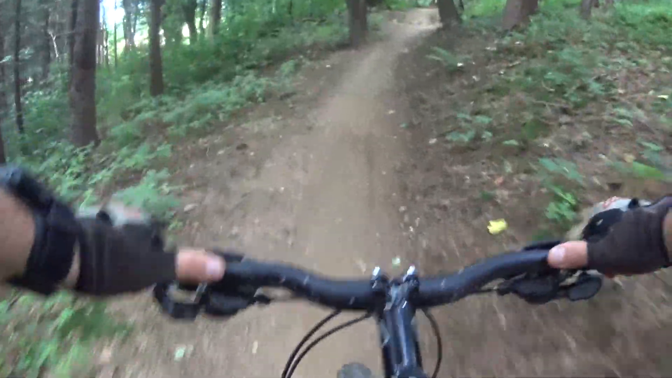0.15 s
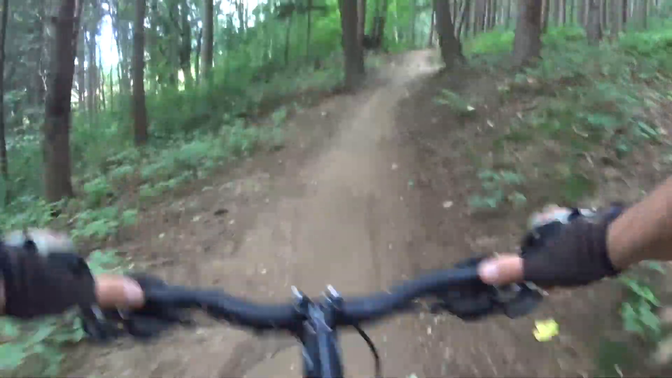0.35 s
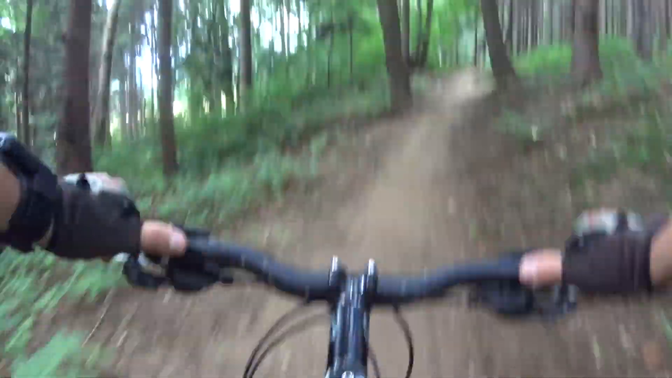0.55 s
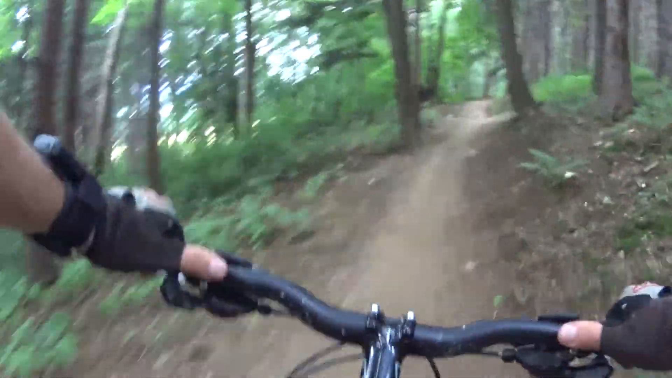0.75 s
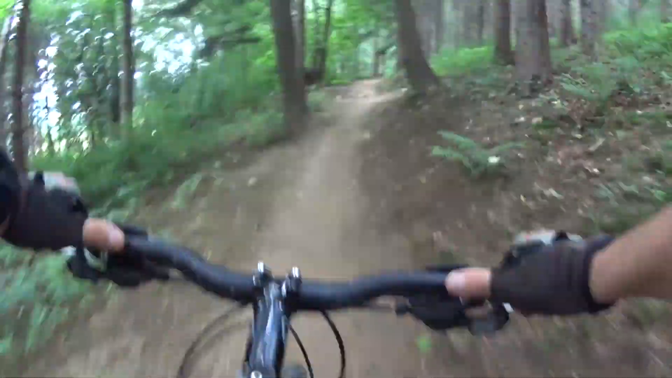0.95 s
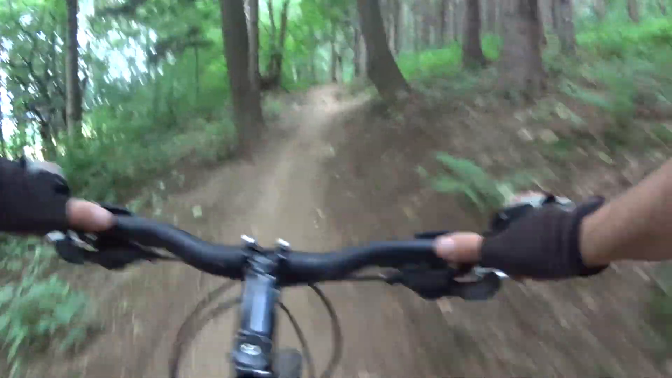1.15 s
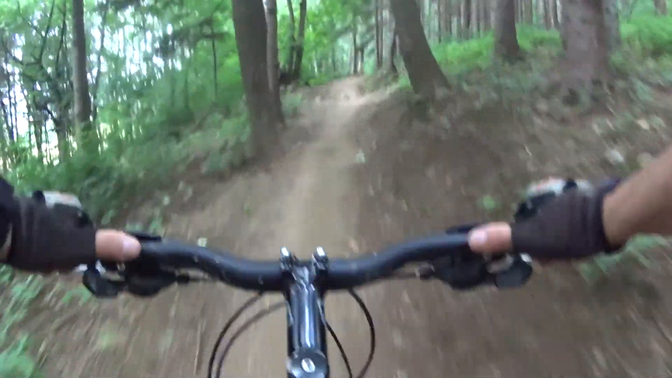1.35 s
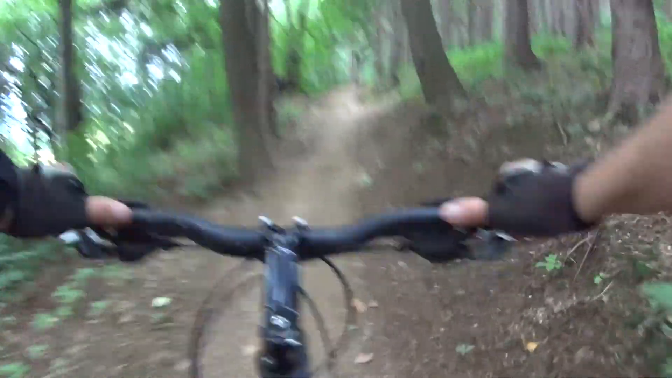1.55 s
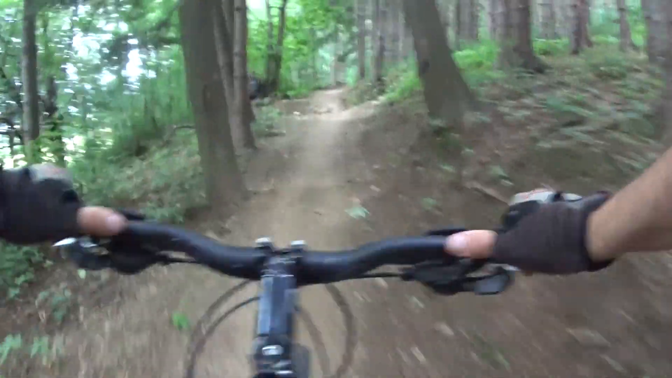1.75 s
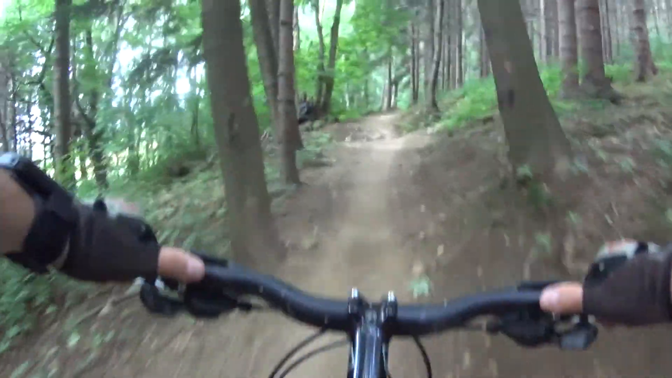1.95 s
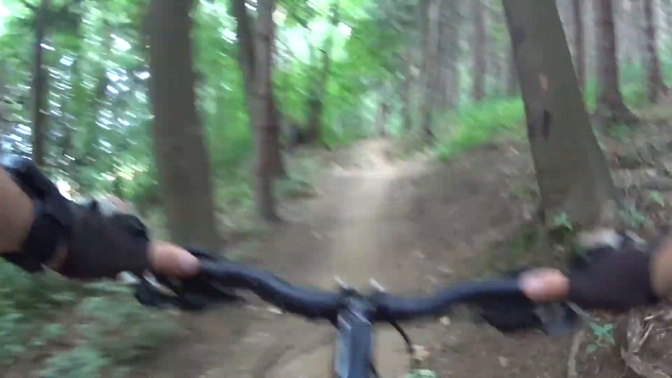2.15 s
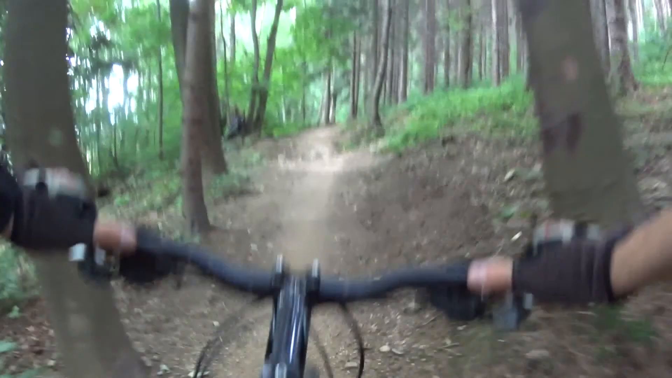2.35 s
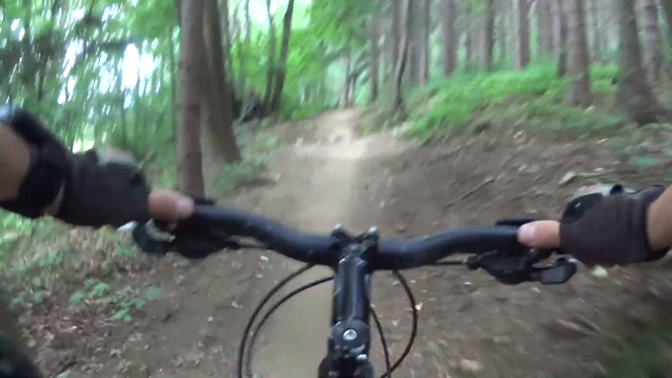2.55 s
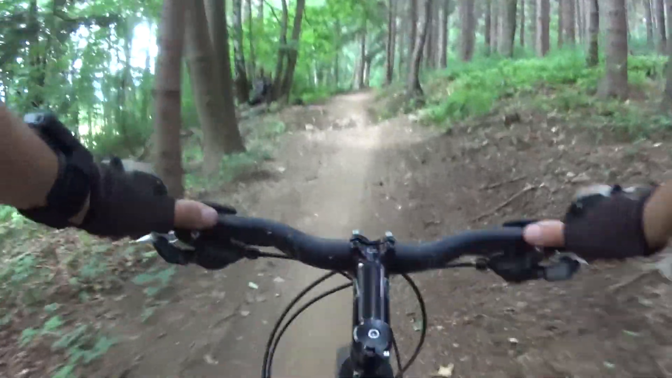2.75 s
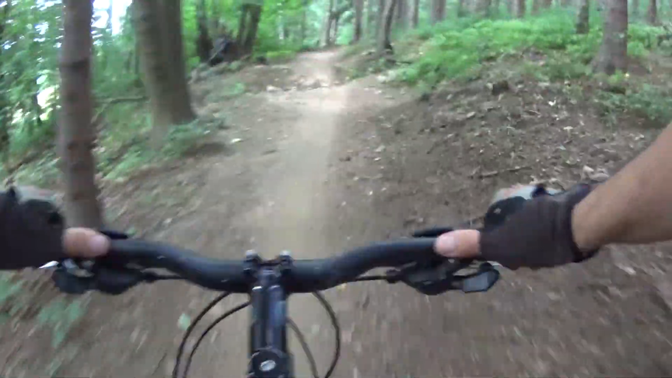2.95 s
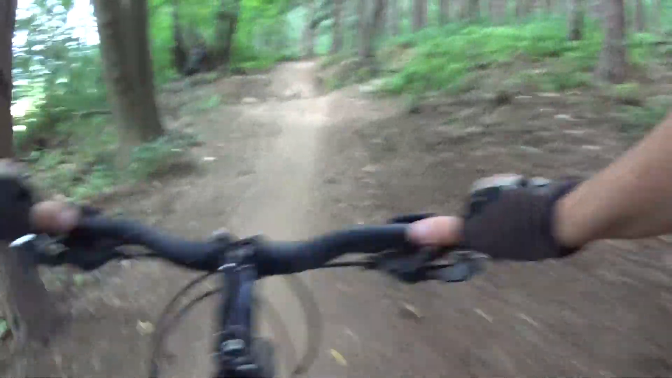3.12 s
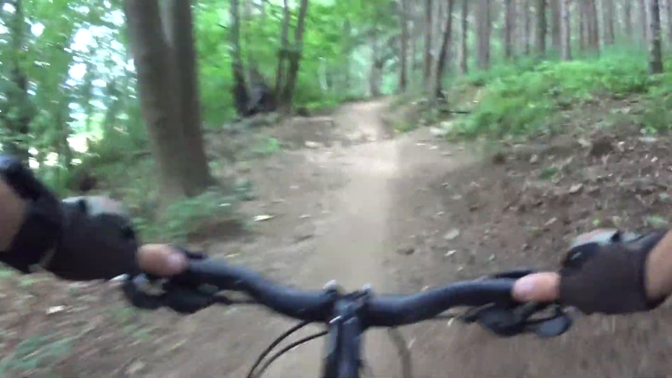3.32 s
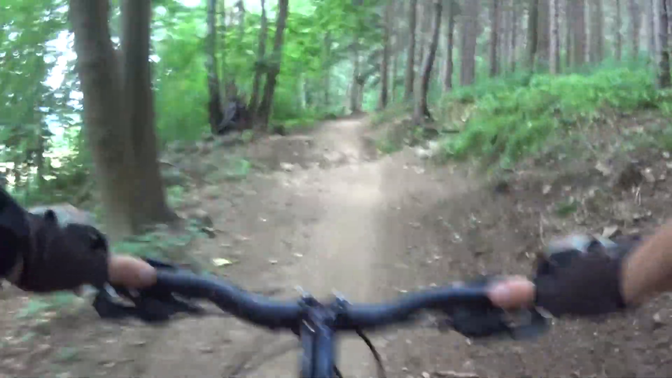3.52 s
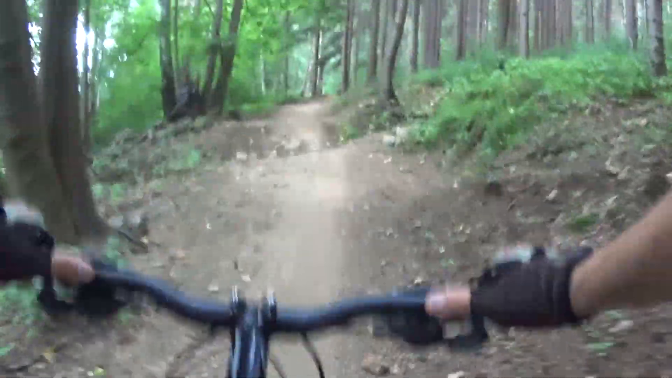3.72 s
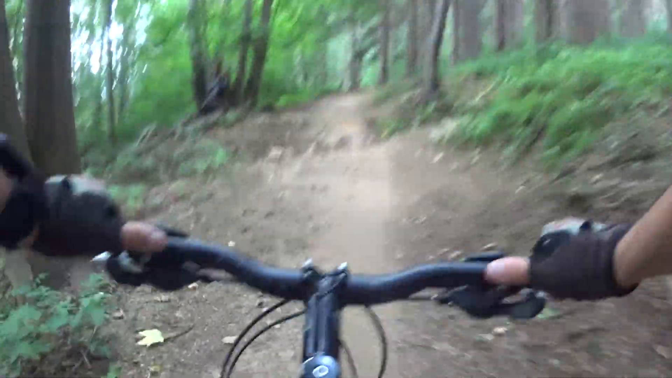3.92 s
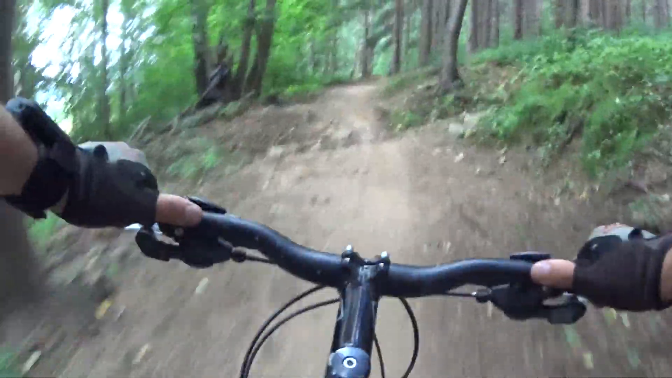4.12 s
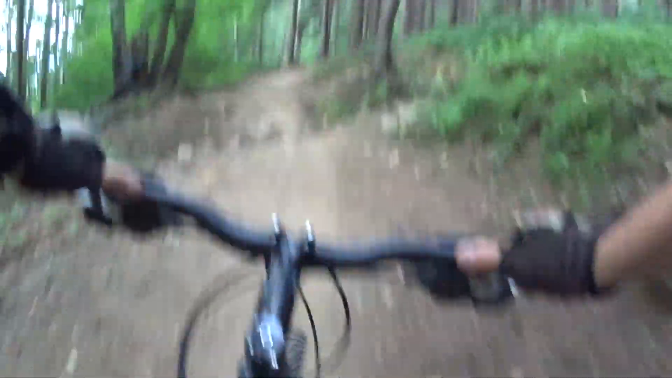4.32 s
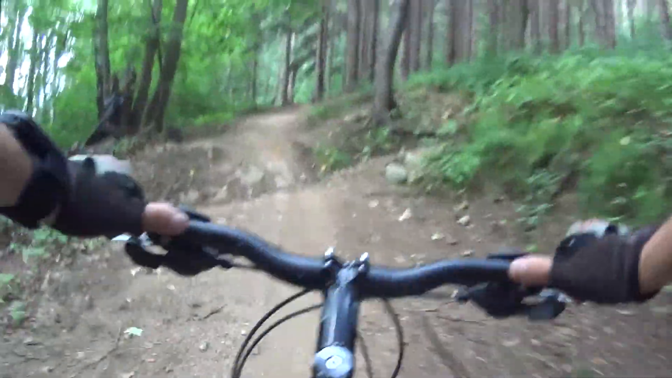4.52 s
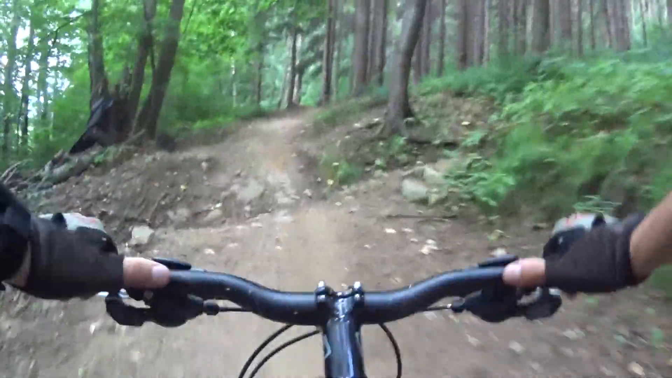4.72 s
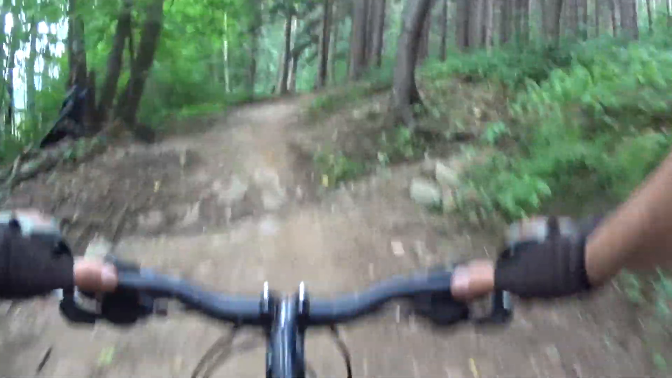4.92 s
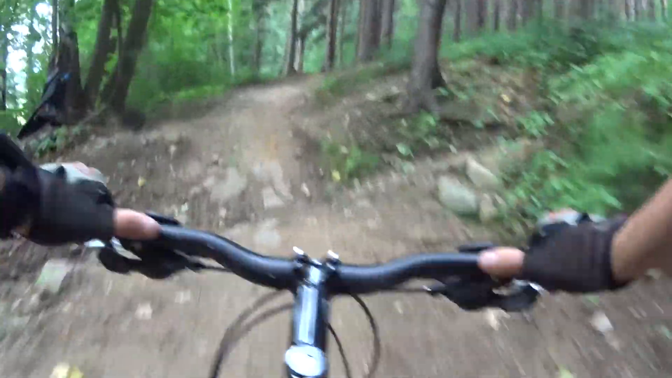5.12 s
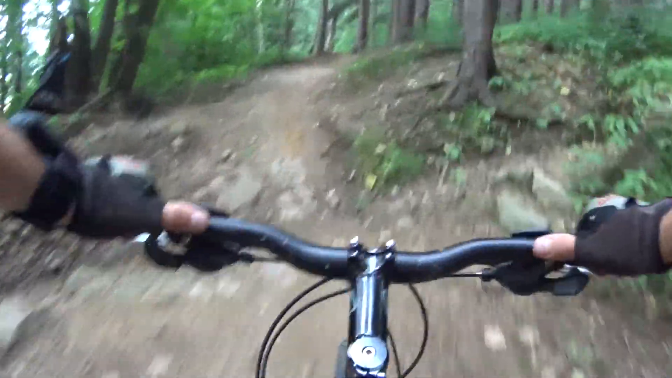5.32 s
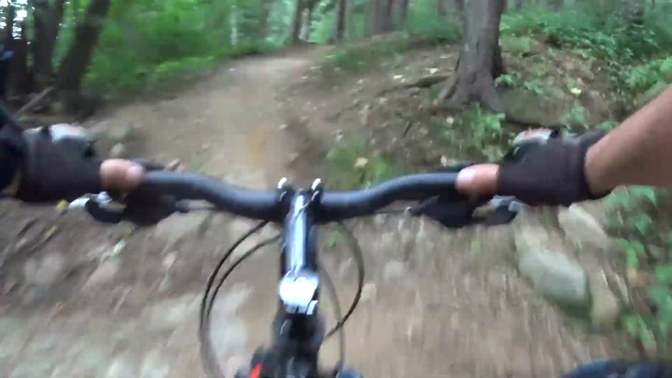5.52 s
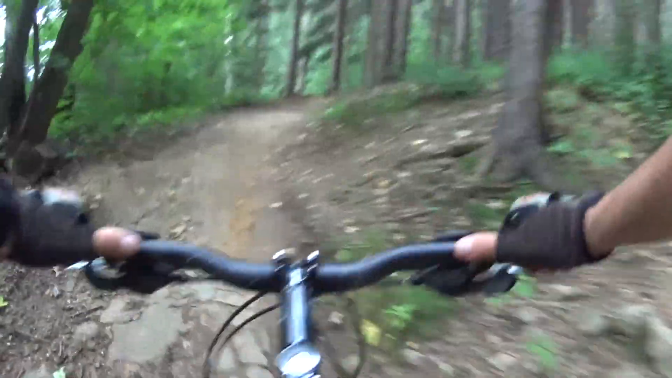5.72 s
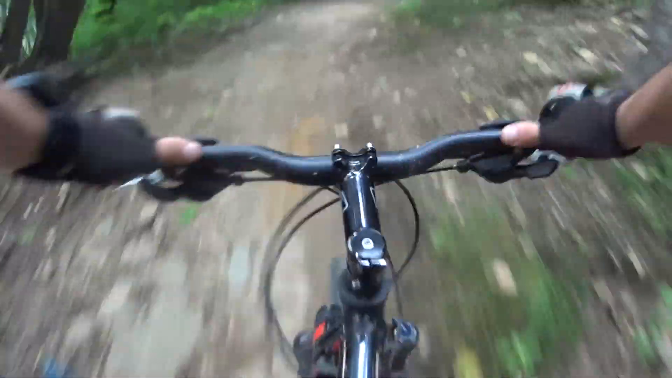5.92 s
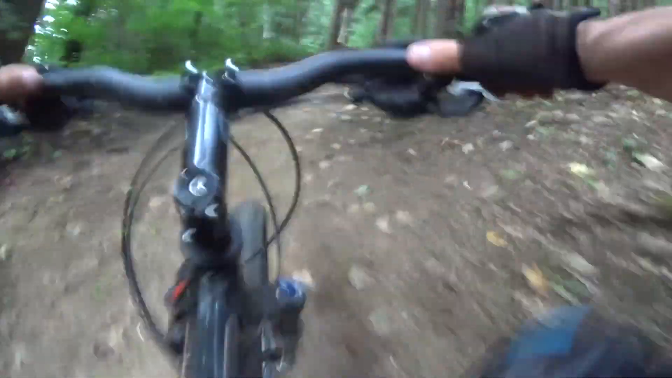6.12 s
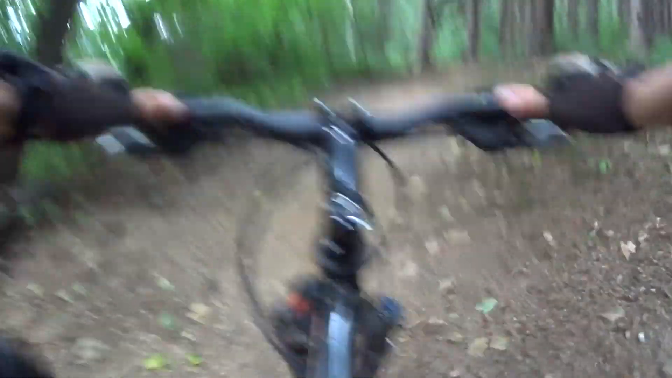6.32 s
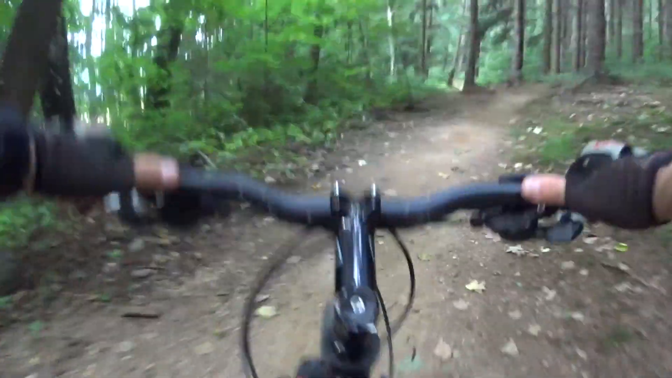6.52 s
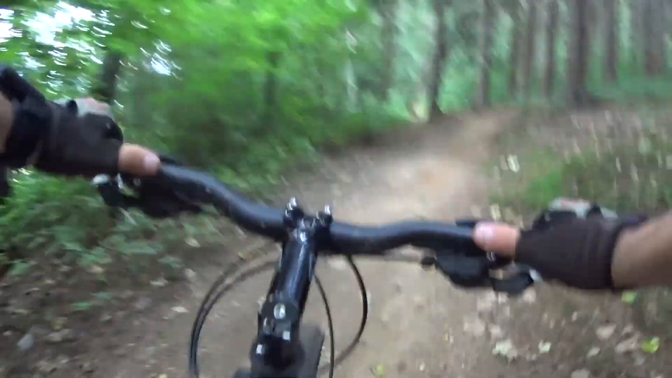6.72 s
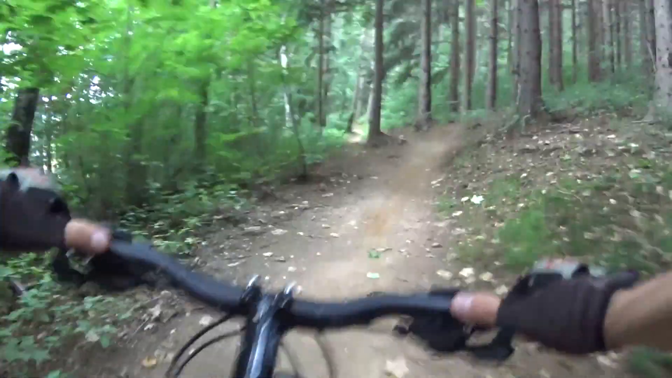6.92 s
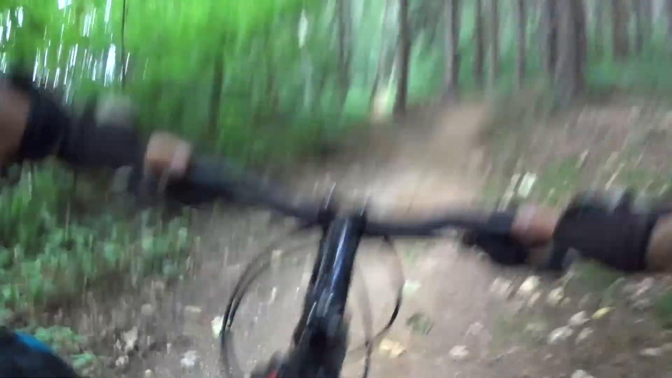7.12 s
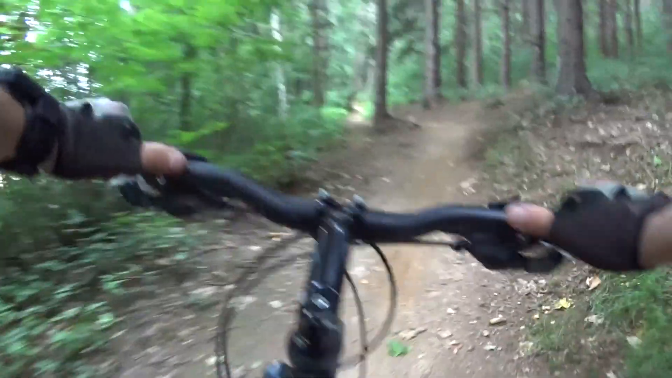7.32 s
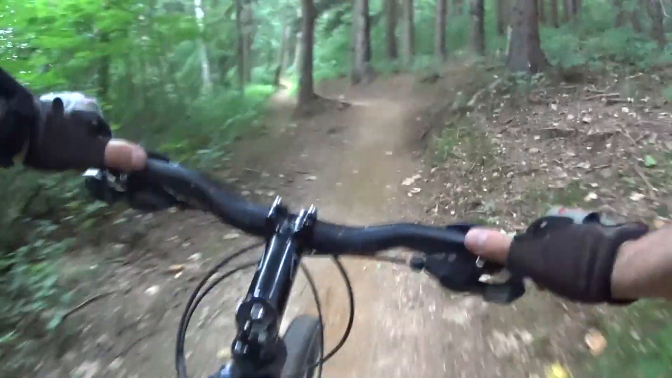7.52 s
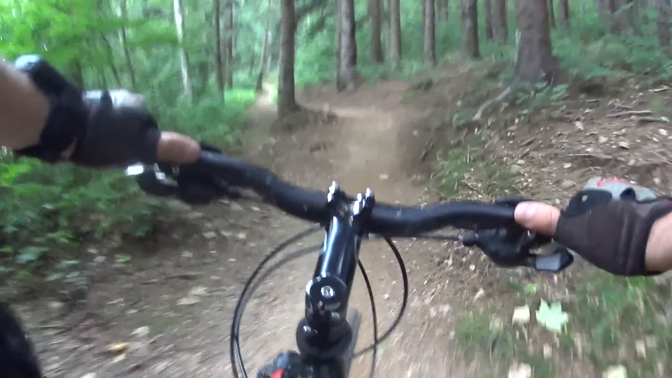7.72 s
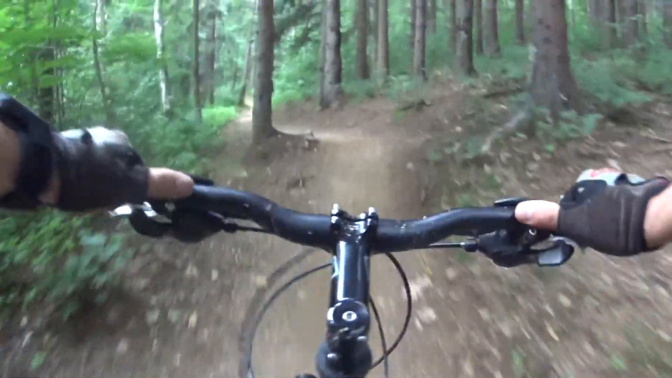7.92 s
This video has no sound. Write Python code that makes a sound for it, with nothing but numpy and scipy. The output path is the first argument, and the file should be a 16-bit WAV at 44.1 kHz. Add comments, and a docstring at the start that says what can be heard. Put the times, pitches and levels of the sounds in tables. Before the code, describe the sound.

Mountain bike races along a dirt forest trail, tyres crackling over grit and snapping stones, camera case knocking and rattling through heavy bumps.

```python
"""Mountain bike on a dirt trail

Heard by a small camera strapped to the rider's chest. Tyres crackle (pitched grains, coloured noise) and flick
stones (damped cycles, noise cracks); one stone pings a spoke. Bumps knock, rattle and scrape the case on its
mount (ringing modes) and thump through the harness (short low pushes). Wind rumbles on the ports (lumpy noise).
A limiter ducks everything under the loudest peaks."""
import sys
import numpy as np
from scipy import signal
from scipy.fft import rfft, irfft, next_fast_len
from scipy.io import wavfile
from scipy.ndimage import uniform_filter1d, minimum_filter1d, map_coordinates

SR = 44100
rng = np.random.default_rng(int(sys.argv[2]) if len(sys.argv) > 2 else 0)


def unload_audio(sound):
    """Save the sound as a 16-bit wav file, at the path given as the first command line argument."""
    columns = np.transpose(np.atleast_2d(sound))
    # keep every value between -1 and 1, then stretch to whole-number steps
    steps = np.round(np.clip(columns, -1, 1) * 32767)
    wavfile.write(sys.argv[1], SR, steps.astype(np.int16))


def ratio(d):
    """dB to gain"""
    e = np.asarray(d, float) / 20
    return 10 ** e


N = 355446

# case against mount: (peak time [s], upper modes level [dB], lower modes level [dB])
KNOCKS = [(0.037, -17.5, -41), (0.2487, -19, -45), (0.338, -30, -21.5), (0.421, -20, -26),
          (0.5776, -15, -22), (0.6137, -21, -13.5), (0.7644, -11, -4.5), (0.8654, -21, -20),
          (0.9925, -17.5, -39), (1.0324, -18, -14.5), (1.0396, 2, -7), (1.3087, -10.5, -14),
          (1.508, -17.5, -18), (1.7246, -2.5, -7.5), (2.095, -21, -43), (2.135, -4.5, -4),
          (2.3102, 6, -2.5), (2.5777, -17, -26), (2.6362, 3, -4), (2.8024, -15, -16), (2.8089, -10, -11.5),
          (2.8153, -9, -14.5), (2.8288, -16, -32), (2.8486, -22, -18), (2.9079, 5.5, -3.5),
          (2.9974, -26, -23), (3.0444, 2.5, -10.5), (3.2075, -19.5, -23), (3.2294, -23, -21.5),
          (3.2611, -38, -23), (3.3828, -3, -9), (3.5087, -1, -5.5), (3.5337, -27, -19.5),
          (3.633, -1, -13.5), (3.6544, 2, -37), (3.6787, 4.5, -3), (3.6984, 6, -4.5), (3.8885, -15, -23),
          (3.9627, -19.5, -26), (4.0295, 2, -6.5), (4.19, -24, -18.5), (4.2616, -19, -23), (4.347, 3.5, -8),
          (4.4495, -2, -6.5), (4.8004, 0.5, -7), (4.8067, -8, -15), (4.9783, 6.5, -5), (5.3195, 3.5, -4),
          (5.5, -30, -18), (5.5086, -21, -30), (5.5234, -12.5, -23), (5.6921, -5.5, -11),
          (5.698, -9.5, -23), (5.722, -8, -15), (5.7374, -23.5, -19), (5.7638, -2, -15),
          (5.7862, -13.5, -23), (5.8058, -13, -21), (5.8412, -5, -7.5), (5.8827, -3, -2), (5.8986, 1, -2.5),
          (5.916, -8, -10), (5.961, -14, -20), (6.049, -12, -8), (6.0587, -12, -20), (6.0701, -13, -8),
          (6.0838, 4, -9), (6.091, -13, -32), (6.1319, -10, -27), (6.1416, -7, -30), (6.1621, -6, -6.5),
          (6.2028, -28, -18), (6.2351, -3, -12), (6.2513, -16, -16), (6.268, -6, -10), (6.2761, -3.5, -20),
          (6.29, -10, -20), (6.3148, -5, -21), (6.3428, -7, -11), (6.3671, 6, -14), (6.3936, -4, -15),
          (6.4007, -4.5, -15), (6.4143, 14, -26), (6.423, 3.5, -8), (6.449, 7, -2), (6.454, 6, -4),
          (6.4904, -3, -13), (6.5129, -7, -6.5), (6.552, -14.5, -20), (6.8609, -1, -18), (6.8693, 3.5, -20),
          (6.9101, -25, -13), (6.9336, 5.5, -2), (7.0034, -16, -23.5), (7.0628, 3.5, -10), (7.24, 5, -7),
          (7.2462, -8, -16), (7.514, 2, -5), (7.7416, -15, -26), (7.8652, -6, -9), (8.0379, -19, -22),
          (8.053, -8, -20)]
# lower modes of the case: (frequency [Hz], level [dB], t60 [s])
CASE_LOW = [(321.4, -2.5, 0.044), (400, -6, 0.063), (484, 2.5, 0.031), (567, -6.5, 0.056),
            (690.4, -1.5, 0.05), (873, -7.5, 0.043)]
# upper modes of the case: (frequency [Hz], level [dB], t60 [s])
CASE_HIGH = [(1036, -6, 0.023), (1218, 1, 0.03), (1355, 0, 0.027), (1523, -1, 0.022), (1688, -3.5, 0.025),
             (2150, -16.5, 0.033)]
LOOSE, BUFFET, SHAKE = 1, 2, 3  # columns of the ride


def unit(x):
    """Scaled to rms 1."""
    return x / np.sqrt(np.mean(x ** 2) + 1e-20)


def along(points, hz):
    """(Hz, value) points read on a log frequency axis."""
    f, v = np.transpose(points)
    return np.interp(np.log(hz + 1), np.log(f + 1), v)


def wobble(knots_per_s):
    """Smooth random curve."""
    return map_coordinates(rng.standard_normal(int(N * knots_per_s / SR) + 4), [np.arange(N) * knots_per_s / SR])


def filtered(x, response):
    """x times a response of frequency."""
    m = next_fast_len(N + 8192)
    return irfft(rfft(x, m) * response(np.fft.rfftfreq(m, 1 / SR)), m)[..., :N]


def at_ports(pair, response_db):
    """Two unrelated sounds, coloured and mixed to the likeness and lean of the two ports; rms 1."""
    # left-right likeness: (frequency [Hz], correlation [0-1])
    alike = [(60, 1), (270, 0.95), (600, 0.62), (1230, 0.75), (2600, 0.91), (5500, 0.76), (11000, 0.51)]
    # left over right: (frequency [Hz], level [dB])
    lean_points = [(30, 1), (130, -6), (500, -4), (1200, -6), (2200, 0.5), (5000, -1.5), (10000, 0)]

    def spread(hz):
        angle = np.arccos(np.clip(along(alike, hz), -1, 1)) / 2
        return ratio(along(response_db, hz)) * [np.cos(angle), np.sin(angle)]

    def lean(hz):
        return ratio(np.outer([.5, -.5], along(lean_points, hz)))

    mid, side = filtered(pair, spread)
    return unit(filtered(np.array([mid + side, mid - side]), lean))


def bursts(per_s, spread_db, life_s):
    """Noise pair gated by random contacts: sizes with a long tail, each dying in life_s."""
    kicks = np.zeros(N)
    draw = rng.random((round(per_s * N / SR), 2))
    kicks[(draw[:, 0] * N).astype(int)] = ratio(-spread_db * np.log(1 - .98 * draw[:, 1]))
    fall = np.exp(-1 / (life_s * SR))
    return signal.lfilter([1], [1, -fall], kicks) * rng.standard_normal((2, N))


def add(track, s, sound):
    """Mix a stereo sound in at s seconds."""
    track[:, round(s * SR):][:, :sound.shape[1]] += sound


def ride(column):
    """One control of the ride in dB, per sample; each layer adds its own offset."""
    # (time [s], loose grit under the tyres [dB], wind buffeting [dB], shaking of the case [dB])
    controls = [(0.0, -34, -51, -49.5), (0.15, -32, -49, -49), (0.3, -30, -46, -47.5),
                (0.43, -31, -37, -44), (0.49, -38, -39.5, -44), (0.81, -40, -49, -44),
                (0.94, -40, -40, -44), (1.3, -36, -41, -44), (1.43, -33, -40, -41.5), (1.6, -37, -41, -44),
                (1.95, -32, -51, -48.5), (2.15, -37, -50, -48), (2.31, -37, -40, -46),
                (2.69, -37, -41.5, -44.5), (2.85, -41, -39, -42.5), (3.12, -37, -42.5, -43),
                (3.4, -45, -42, -46), (3.61, -43, -35, -44), (3.9, -40, -44, -49), (4.33, -38, -39.5, -44),
                (4.53, -38, -43.5, -45.5), (5.1, -37, -49, -47), (5.4, -32, -41.5, -46),
                (5.72, -33, -50.5, -45), (5.86, -33, -30, -32), (6.1, -34, -28, -34), (6.3, -36, -33, -31),
                (6.42, -36, -36, -34), (6.62, -36, -38.5, -42), (6.93, -35, -39, -41),
                (7.45, -37, -44, -48), (7.63, -38, -43, -45), (7.79, -33, -43.5, -47),
                (8.06, -35, -43, -44)]
    rows = np.array(controls)
    return np.interp(np.arange(N) / SR, rows[:, 0], rows[:, column])


def swing(control_db):
    """A control about its mean."""
    return control_db - control_db.mean()


def scattered(control_db, count):
    """Random times in s, denser where the control is strong."""
    share = np.cumsum(ratio(control_db))
    return np.searchsorted(share / share[-1], rng.random(count)) / SR


def grit(per_s, spread_db, centre_hz, scatter, cycles):
    """Tiny pitched grains, a few cycles each, with a long tail of sizes; a pair of unrelated signs."""
    draw = rng.random((round(per_s * N / SR), 5))
    t = np.arange(128) / SR
    hz = centre_hz * np.exp(scatter * (draw[:, 1:2] + draw[:, 2:3] - 1))
    size = ratio(-spread_db * np.log(1 - .99 * draw[:, 3:4]))
    grain = size * np.sin(2 * np.pi * hz * t) * hz * t * np.exp(-hz * t / cycles)
    where = ((draw[:, :1] * N).astype(int) + np.arange(len(t))).ravel()
    signed = (grain * np.sign(draw[:, 4:] - .5)).ravel()
    return np.array([np.bincount(where, g, N + len(t))[:N] for g in (grain.ravel(), signed)])


def tyres():
    """Grit crackle in clumps, fine sand above it, a smoother rolling hiss and an air rush that rises with the gusts."""
    # colour of the crackle: (frequency [Hz], response [dB])
    grit_colour = [(800, -20), (1200, -16), (1500, -1.5), (1900, -2.5), (2300, 1.5), (3000, -1.5),
                   (3700, -3), (4500, 17.5), (6000, 12), (8000, -25)]
    # colour of the sand: (frequency [Hz], response [dB])
    sand_colour = [(900, -37), (1600, -7), (2300, 0), (3600, -2), (4600, -2), (6000, -4.5), (7600, -25.5),
                   (8500, -11), (11300, -36)]
    # colour of the rolling hiss and the air: (frequency [Hz], response [dB])
    hiss_colour = [(530, -11), (900, -6), (1090, -6), (1260, 2.5), (1700, 2), (1910, -3.5), (2280, -0.5),
                   (3680, -8), (4690, -4.5), (6050, -12), (7560, -20.5), (10600, -17), (11300, -17),
                   (14700, -91), (22000, -120)]
    loose_db, buffet_db, shake_db = ride(LOOSE), ride(BUFFET), ride(SHAKE)

    clumps = ratio(2.3 * wobble(12) + 4.03 * wobble(40))
    grains = grit(per_s=1000, spread_db=4.5, centre_hz=2300, scatter=0.42, cycles=0.84)
    crackle = at_ports(clumps * grains, grit_colour)
    crackle_db = loose_db + 2 + 0.34 * swing(loose_db)  # swings wider than its control

    sand = at_ports(np.sqrt(clumps) * bursts(per_s=600, spread_db=4, life_s=.0008), sand_colour)
    hiss = at_ports(ratio(0.55 * wobble(25)) * rng.standard_normal((2, N)), hiss_colour)
    rolling = ratio(1.0) * sand + ratio(3) * hiss
    roll_db = -40.5 + 0.55 * swing(loose_db) + 0.19 * swing(shake_db)

    air = at_ports(rng.standard_normal((2, N)), hiss_colour)
    air_db = -43 + 0.5 * swing(buffet_db)
    return ratio(crackle_db) * crackle + ratio(roll_db) * rolling + ratio(air_db) * air


def wind():
    """Lumpy low buffeting on the ports over a steady low rush."""
    # colour of the buffeting: (frequency [Hz], response [dB])
    rumble_colour = [(12, -30), (20, 3), (147, -7.5), (220, -10), (500, -15), (650, -26), (1100, -120)]
    rush_colour = [(15, -32), (30, 2.5), (200, -9.5), (900, -18.0), (1400, -60)]  # (Hz, dB)
    lumps = ratio(2.4 * wobble(7) + 3.3 * wobble(25))
    buffeting = at_ports(lumps * rng.standard_normal((2, N)), rumble_colour)
    rush = at_ports(rng.standard_normal((2, N)), rush_colour)
    return ratio(ride(BUFFET) + 4.5) * buffeting + ratio(-46) * rush


def rattle():
    """Small shakes of the case between the knocks, coming in flurries."""
    # colour of the shakes: (frequency [Hz], response [dB])
    rattle_colour = [(71, -42), (120, -10), (167, -2.5), (308, 0), (517, -9), (616, 4), (702, -2),
                     (808, -5), (1110, -3.5), (1220, 2.5), (1680, -18), (1860, -38), (2000, 2.5),
                     (2600, -42), (4400, -120)]
    shakes = ratio(1.7 * wobble(7)) * bursts(per_s=180, spread_db=5.5, life_s=0.0053)
    return ratio(ride(SHAKE) - 0.5) * at_ports(shakes, rattle_colour)


def ring(modes, t, lag_rad, build_s):
    """Modes at new strengths, roughly in step at build_s, a little apart at the two ports; mid peak 1."""
    hz, db, t60 = np.transpose(modes)[:, :, None]
    draw = rng.standard_normal((len(modes), 4))
    size = ratio(db + 2.83 * draw[:, :1] - 60 * t / t60)
    detuned_hz = hz * (1 + .015 * draw[:, 1:2])
    phase = 2 * np.pi * detuned_hz * (t - build_s) + 1.2 * draw[:, 3:]
    lag = lag_rad * draw[:, 2:3]  # one port ahead, the other behind
    pair = np.array([np.sum(size * np.cos(phase + lag), 0), np.sum(size * np.cos(phase - lag), 0)])
    pair = pair * np.sin(np.pi / 2 * np.clip(t / build_s, 0, 1)) ** 2  # the blow builds up
    return pair / np.abs(pair.mean(0)).max()


def knocks():
    """Every blow rings the case's upper and lower modes; light taps fall at random as the case shakes."""
    tap_high_db, tap_low_db, tap_spread_db = -24.5, -25.5, 4.4
    track, t, build_s = np.zeros((2, N + SR)), np.arange(SR // 10) / SR, .0022
    taps = [(s + build_s, *rng.normal((tap_high_db, tap_low_db), tap_spread_db))
            for s in scattered(ride(SHAKE), count=22)]
    for s, high_db, low_db in KNOCKS + taps:
        lean_db = rng.normal(-3, 2)  # left over right
        upper = ratio(high_db) * ring(CASE_HIGH, t, 0.2, build_s)
        lower = ratio(low_db) * ring(CASE_LOW, t, 0.42, build_s)
        add(track, s - build_s, (upper + lower) * ratio([[lean_db / 2], [-lean_db / 2]]))
    return track[:, :N]


def pebbles(count):
    """Rows like those of the louder stones, falling at random where the grit is loose."""
    peak_db, peak_spread_db, highest_hz, pitch_spread, crack_db = -19, 2.5, 2200, 0.02, -37.5
    draw = rng.standard_normal((count, 3))
    return [(s + 0.00101, peak_db + peak_spread_db * a, highest_hz * np.exp(-pitch_spread * abs(b)),
             crack_db + peak_spread_db * c)
            for s, (a, b, c) in zip(scattered(ride(LOOSE), count), draw)]


def stones():
    """A few damped cycles at the stone's pitch, a dying crunch, a sharp crack and spray of sand; one spoke ping."""
    # louder stones snapping under the tyres: (peak time [s], peak level [dB], pitch [Hz], crack level [dB])
    loud_stones = [(0.0365, -7.5, 2240, -40), (0.052, -15.5, 2740, -59), (0.1253, -13.5, 2590, -33.5),
                   (0.136, -11, 2400, -37.5), (0.1718, -15, 2640, -38.5), (0.2095, -3, 2550, -36.5),
                   (0.2484, -16, 2340, -38), (0.2622, -8, 2350, -41), (0.2783, -10.5, 2520, -41.5),
                   (0.2896, -12, 2200, -39.5), (0.315, -10.5, 2340, -39.5), (0.341, -15.5, 2370, -39.5),
                   (0.359, -11, 2260, -36), (0.3935, -14, 2400, -41), (0.4073, -6, 2150, -41),
                   (0.422, -15, 2090, -37.5), (0.4452, -4, 2350, -37), (0.917, -14.5, 2410, -44),
                   (1.0116, -8, 2500, -23), (1.1461, -14, 2580, -20), (1.427, -10.5, 2350, -40.5),
                   (1.4378, -7, 2420, -39), (1.4495, -12.5, 2310, -32), (1.4855, -6, 2150, -34),
                   (1.6102, -13, 2350, -39), (1.649, -17, 3310, -21), (1.6935, -4, 2320, -36.5),
                   (1.7168, -5, 2530, -19), (1.7707, -12, 2940, -35), (1.808, -8, 2800, -39),
                   (1.9717, -12, 2300, -24), (2.0941, -6, 2300, -38), (2.1818, -23, 3400, -25),
                   (2.3437, -4, 2350, -38.5), (2.3849, -12, 3420, -30), (2.3902, -13, 2360, -41),
                   (2.443, -16, 4260, -22), (2.476, -13, 4300, -14), (2.577, -16, 5030, -21),
                   (2.719, -12.5, 3430, -37), (2.8134, -12, 2290, -39), (3.1213, -16.5, 3830, -24),
                   (3.4464, -14, 2730, -25), (3.49, -14.5, 2240, -45), (3.6546, -10, 2060, -40),
                   (3.6815, -3.5, 2180, -43.5), (3.684, -8.5, 4350, -44), (3.769, -14, 3200, -40),
                   (3.8424, -11, 2720, -43), (3.888, -15.5, 3560, -33), (3.9942, -22, 5400, -9.5),
                   (4.1015, -10.5, 2070, -39.5), (4.125, -10, 2300, -37.5), (4.1355, -10, 2650, -28),
                   (4.3719, -13, 2540, -42), (4.3913, -9.5, 2140, -22.5), (4.492, -7, 2530, -40),
                   (4.6508, -10.5, 2500, -34), (4.7386, -11, 2670, -29), (4.7684, -3, 2460, -40.5),
                   (4.8307, -13, 3130, -40), (4.9591, -10.5, 2250, -41.5), (5.098, 3, 2370, -28),
                   (5.186, -15, 2360, -26), (5.2833, -13, 2370, -25), (5.315, -7, 2330, -24),
                   (5.3491, -3, 2890, -18), (5.4255, -10.5, 2440, -38), (5.5058, -8, 2380, -40),
                   (5.5983, 3, 2300, -34), (5.6438, -4, 2750, -36), (5.6603, -12, 2800, -38),
                   (5.817, -13, 2160, -21), (5.821, -5, 2780, -14), (5.8369, -15, 2620, -30),
                   (5.8566, -8, 2310, -33), (5.8748, -4.5, 2560, -36.5), (5.9154, -9, 1920, -38.5),
                   (5.9212, -8, 2540, -38), (5.9295, -5, 2300, -37), (5.9594, -6, 2080, -23),
                   (6.0258, -18, 2360, -21), (6.034, -16, 4400, -21), (6.057, -9, 2610, -23),
                   (6.0996, -15, 2540, -17), (6.1314, -2, 2030, -33), (6.1394, -6, 2130, -41),
                   (6.2396, -6, 2760, -21), (6.247, -8, 5030, -17), (6.2518, -11, 4800, -28),
                   (6.341, -19, 2530, -22), (6.369, -9, 4730, -36), (6.423, -7, 4500, -38),
                   (6.6038, -20, 5200, -15.5), (6.8512, -15, 2410, -45), (7.0364, -12, 2270, -41),
                   (7.1109, -11, 2170, -43), (7.2039, 1, 2190, -36.5), (7.4433, -15, 2560, -35),
                   (7.481, -14, 2950, -36.5), (7.5943, -7, 2340, -41), (7.6876, -9, 2480, -37.5),
                   (7.71, -12.5, 2220, -45), (7.7378, -12.5, 2340, -44.5), (7.8224, -8, 2150, -38),
                   (7.8357, -0.5, 1980, -40.5), (7.92, -11, 2300, -39)]
    # modes of the pinged spoke: (frequency [Hz], level [dB], t60 [s])
    spoke = [(3240, -5, .05), (5200, -1, .05), (8200, -12, .07), (9250, -13, .06), (10980, -3, 0.084)]
    ping_s, ping_db = 6.6045, -17.5
    track, crunch, cracks = np.zeros((3, 2, N + SR))
    t, build_s = np.arange(SR // 20) / SR, .0005
    for s, db, hz, crack_db in loud_stones + pebbles(count=80):
        modes = [(hz, 0, .01), (hz * 1.217, -4, .007), (hz * 0.769, -4, .01), (hz * 1.734, -8, .006),
                 (5800, -14, .006)]
        half_lean_db = rng.normal(0, 1.8)
        snap = ratio(db) * ring(modes, t, 0.14, build_s)
        add(track, s - build_s, snap * ratio([[half_lean_db], [-half_lean_db]]))
        # noise mostly shared by the two ports
        spray = rng.standard_normal((2, 1, len(t))) + 0.41 * rng.standard_normal((2, 2, len(t)))
        add(crunch, s, ratio(db - 7 - 60 * t / 0.04) * spray[0])
        crack_fall = ratio(-60 * t / 0.0059) + ratio(-6.0 - 60 * t / 0.074)
        add(cracks, s - build_s, ratio(crack_db) * crack_fall * spray[1])
    add(track, ping_s, ratio(ping_db) * ring(spoke, np.arange(SR // 8) / SR, 0.22, 0.00039))

    def bright(hz):
        return 1 / (1 + (3500 / (hz + 1)) ** 4) / np.sqrt(1 + (hz / 5500) ** 3)

    def gritty(hz):
        return 1 / (1 + (1500 / (hz + 1)) ** 6) / (1 + (hz / 4000) ** 3)

    return track[:, :N] + filtered(crunch[:, :N], gritty) + filtered(cracks[:, :N], bright)


def thumps():
    """A low push of little more than one cycle, stronger on the right, then strap hum; every listed knock passes one on."""
    # bumps reaching the harness straight from the frame: (peak time [s], peak level [dB], pitch [Hz])
    frame_bumps = [(0.339, -23, 180), (0.417, -22.5, 133), (0.445, -23, 90), (0.55, -23, 110),
                   (0.768, -11.5, 159), (0.867, -14, 127), (0.944, -17.5, 183), (0.965, -22, 137),
                   (1.489, -18, 159), (1.506, -18.5, 189), (1.522, -22, 139), (1.725, -15, 132),
                   (1.831, -19.5, 164), (2.756, -22, 129), (2.795, -18, 127), (2.814, -17, 185),
                   (2.85, -10, 152), (2.88, -23, 162), (3.001, -22, 232), (3.203, -18.5, 160),
                   (3.513, -15, 172), (3.698, -6.5, 140), (3.892, -21, 105), (4.804, -13, 164),
                   (5.748, -19, 172), (5.826, -23, 185), (5.861, -19, 102), (5.906, -5, 279),
                   (5.959, -11.5, 123), (6.042, -9, 150), (6.051, -1.5, 192), (6.07, -12, 177),
                   (6.119, -12.5, 177), (6.212, -19, 179), (6.232, -9, 186), (6.266, 1.5, 241),
                   (6.341, -15, 117), (6.365, 2.5, 266), (6.675, -22, 97), (6.875, -5.5, 265),
                   (6.916, -10, 170), (6.982, -21.5, 150), (7.07, -14, 270)]
    harness_db, harness_hz, harness_lag_s = -8.5, 162, 0.0028  # level relative to the knock's lower modes
    track, t = np.zeros((2, N + SR)), np.arange(SR // 8) / SR
    passed_on = [(s + harness_lag_s, low_db + harness_db, harness_hz) for s, _, low_db in KNOCKS]
    strap_hum = ratio(-17.5 - 60 * t / 0.083) * np.sin(2 * np.pi * 171 * t)
    for s, db, hz in frame_bumps + passed_on:
        push = np.sin(2 * np.pi * hz * t) * np.exp(-t * hz) + strap_hum
        push = push * (1 - np.exp(-t / 0.00048))  # soft onset
        push = rng.choice([-1, 1]) * push / np.abs(push).max()
        add(track, s - 0.41 / hz, ratio(db) * push * ratio([[-3], [2.5]]))
    return track[:, :N]


def scrapes():
    """Dense small contacts keep the case's modes ringing while it drags."""
    # case drags and chatters on its mount: (start [s], end [s], upper modes level [dB], lower modes level [dB])
    drags = [(0.666, 0.694, -47, -36), (0.837, 0.95, -38.5, -39), (1.351, 1.413, -38, -33.5),
             (1.476, 1.55, -33.5, -30), (1.794, 1.862, -45, -37.5), (2.782, 2.819, -30, -31),
             (3.678, 3.713, -39, -22.5), (4.14, 4.262, -35.5, -38), (5.477, 5.511, -36, -34),
             (5.683, 5.729, -34, -27.5), (5.749, 5.833, -28, -30), (5.836, 5.854, -21, -22),
             (5.869, 5.901, -15.5, -14), (5.906, 5.927, -25, -24), (6.126, 6.142, -20, -35),
             (6.165, 6.184, -25.5, -32), (6.273, 6.293, -24.5, -24), (6.413, 6.42, -27, -34),
             (6.487, 6.517, -23, -20), (6.852, 6.874, -27.5, -26), (6.9, 6.95, -47, -35)]
    t, total = np.arange(N) / SR, 0

    def edge(start_s, end_s):
        return np.clip(np.minimum(t - start_s, end_s + 0.0043 - t) / 0.0033, 0, 1)

    for column, modes in ((2, CASE_HIGH), (3, CASE_LOW)):
        def body(f):
            response = 0
            for mode_hz, db, t60 in modes:
                width_hz = np.log(1000) / np.pi / t60
                response = response + ratio(db) * 1j * f * width_hz / (mode_hz ** 2 - f * f + 1j * f * width_hz)
            return response

        one, other = filtered(bursts(per_s=500, spread_db=0.0, life_s=0.0018), body)
        chatter = unit(np.array([(one + 0.69 * other) * ratio(-4.5), (one - 0.27 * other) * ratio(-0.5)]))
        total = total + chatter * sum(ratio(row[column]) * edge(row[0], row[1]) for row in drags)
    return total


def scene():
    """All sources at the camera."""
    return tyres() + wind() + rattle() + knocks() + stones() + thumps() + scrapes()


def low_pass(x):
    """Removes everything above the highest recorded frequency."""
    return signal.sosfilt(signal.butter(12, 12430, fs=SR, output="sos"), x)


def record(dry):
    """Ports slightly out of step; look-ahead limiter shared by both channels, with a slower recovery; band limit."""
    # left port behind right: (frequency [Hz], phase lag [rad])
    port_lag = [(30, 0.32), (130, 0.61), (450, 0.19), (860, 0.91), (1120, 0.47), (1800, 0.04), (2330, 0.76),
                (3500, .02)]
    threshold_db, firmness, hold, ahead = -7, .75, 300, 110  # hold and ahead in samples
    over = np.maximum(np.abs(dry).max(0) / ratio(threshold_db), 1)
    gain = minimum_filter1d(over ** -firmness, size=hold, origin=hold // 2 - ahead)
    cut_db = 20 * np.log10(gain)
    keep = np.exp(-1 / (0.01 * SR))  # 10 ms recovery
    cut_db = np.minimum(cut_db, signal.lfilter([1 - keep], [1, -keep], cut_db))
    ports = filtered(dry, lambda hz: np.exp(1j * np.outer([-.5, .5], along(port_lag, hz))))
    limited = ports * ratio(uniform_filter1d(cut_db, size=ahead))
    mix = filtered(limited, lambda hz: 1 / (1 + np.minimum(hz / 11150, 1.2) ** 150))  # steep low-pass
    return low_pass(mix)


dry = scene()
out = record(dry)
unload_audio(out)
```